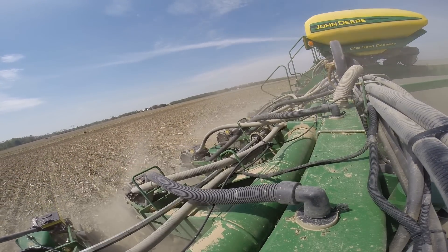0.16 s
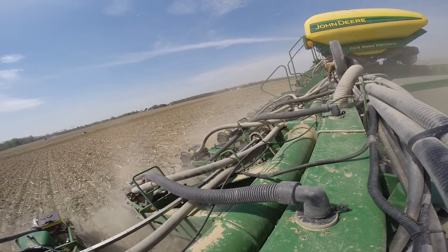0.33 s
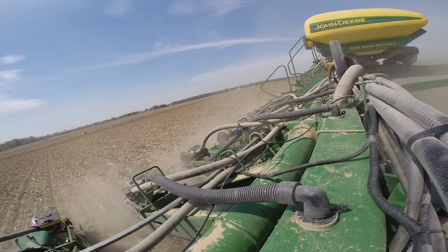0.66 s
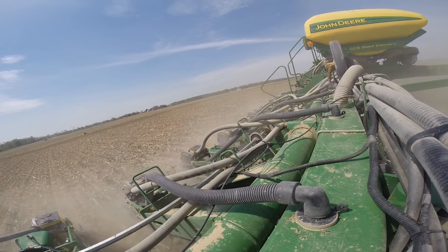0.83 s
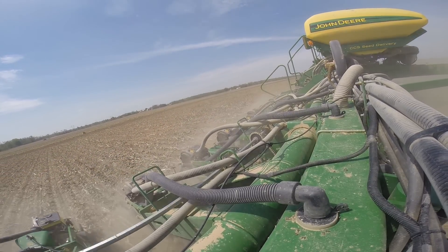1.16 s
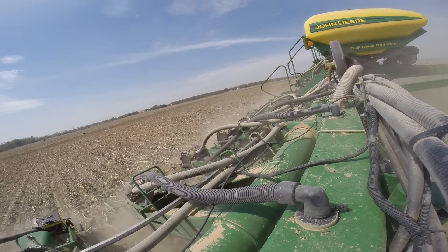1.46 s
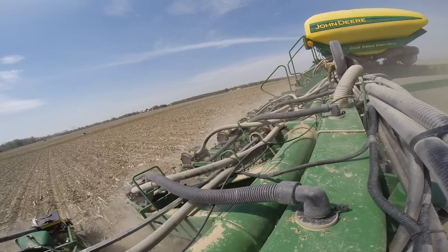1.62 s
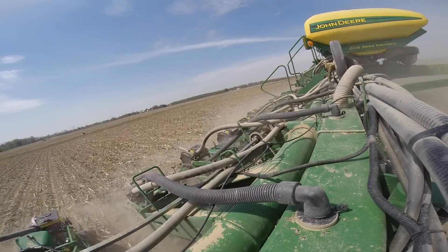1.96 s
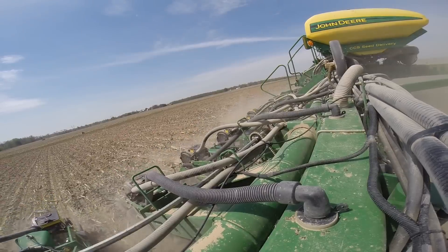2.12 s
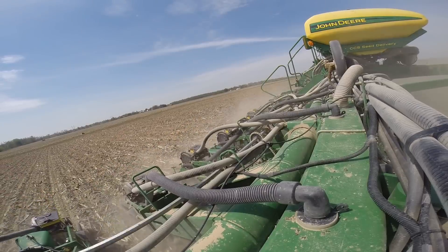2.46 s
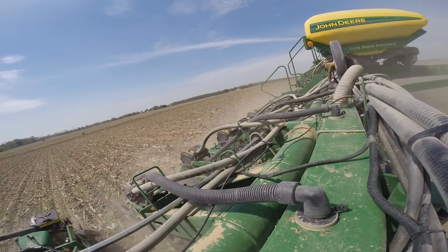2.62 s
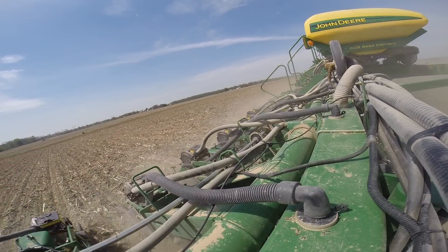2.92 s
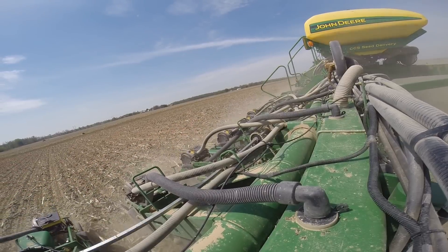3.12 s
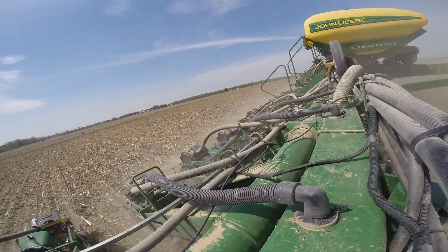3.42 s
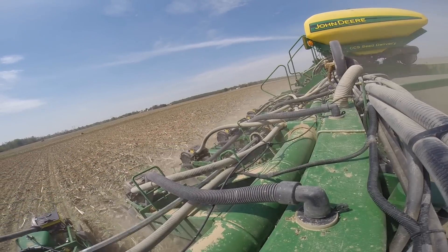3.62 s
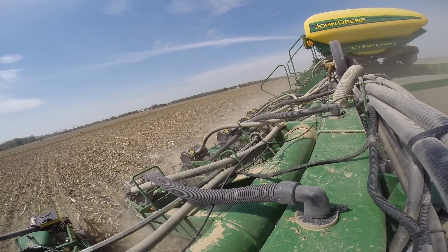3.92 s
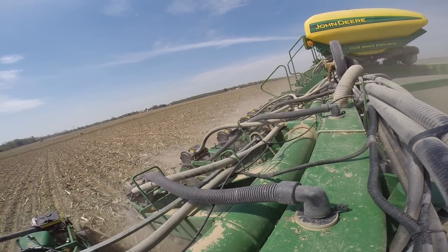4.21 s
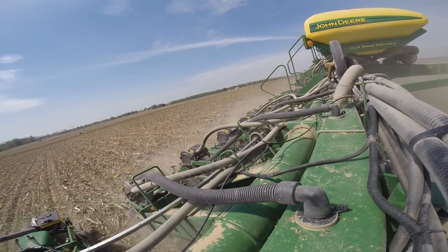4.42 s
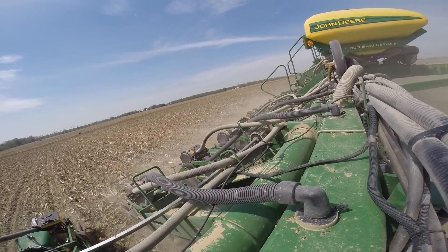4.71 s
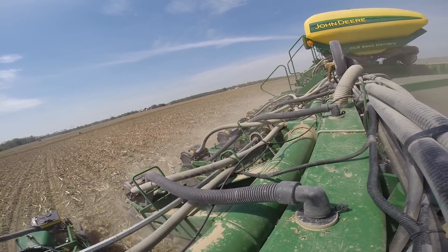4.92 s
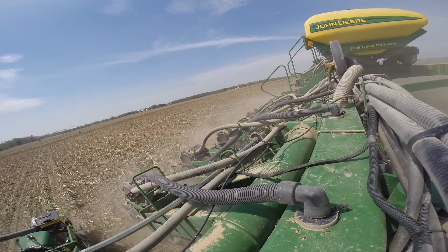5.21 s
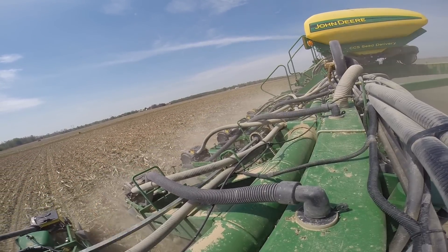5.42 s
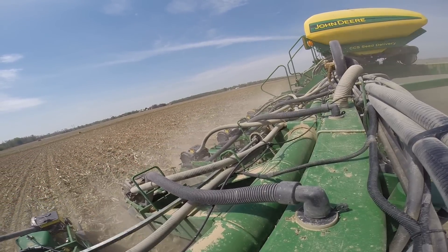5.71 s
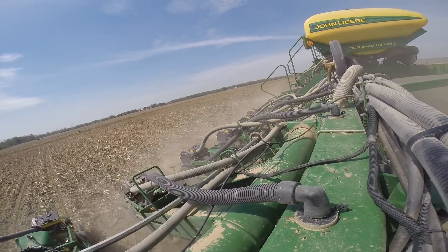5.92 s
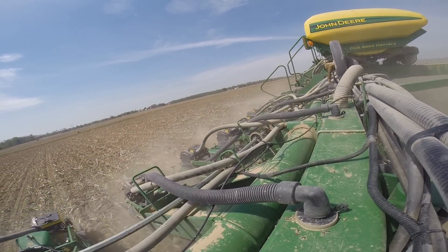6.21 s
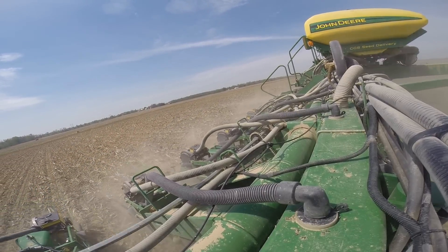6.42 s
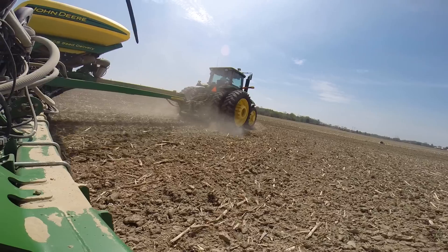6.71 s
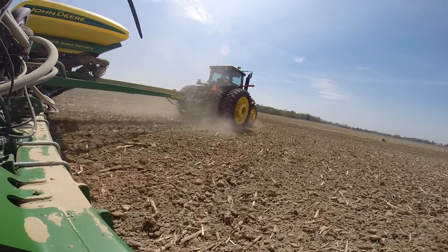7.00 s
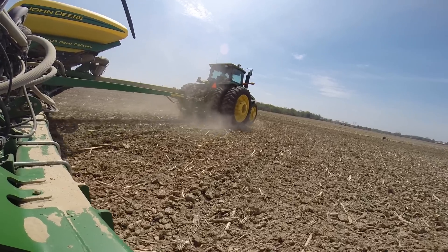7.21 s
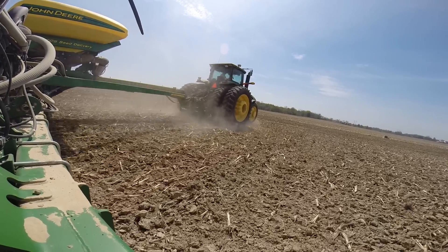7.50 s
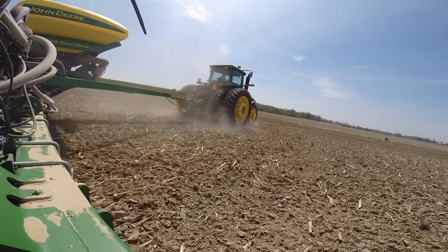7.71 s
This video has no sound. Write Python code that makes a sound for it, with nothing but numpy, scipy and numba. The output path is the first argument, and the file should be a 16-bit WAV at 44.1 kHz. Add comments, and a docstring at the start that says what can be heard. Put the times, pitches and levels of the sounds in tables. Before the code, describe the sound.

Close, dry outdoor sound from a seed planter's frame in a tilled field. From 0 to 6.7 seconds, a heavy low rumble swells and eases unevenly under pattering soil, loose steel rattle, a low blower hum with faint whine and steady airy hiss. Small knocks dot the first 1.6 seconds, and short dry squeals around 2 kHz recur, a longer one at 1.1 and another at 2.8. Hard hollow clanks with deep thuds and lingering sway hit at 2.25 and 2.4, then 3.5, a sharp one at 4.4, 5.0 and 5.7; the loudest briefly duck everything. Chirps cluster near 4.1 and 5.0 to 5.3. Lighter knocks follow at 6.1 to 6.4. At 6.75 it switches abruptly to a steadier diesel drone and low rumble, with thin wavering whines, soft soil hiss, sparse bright grit ticks and two faint squeaks, continuing to the end near 8.

```python
"""A wide seed planter rumbles and rattles over a dry tilled field behind a tractor, heard from its frame.
Noise and tiny random impacts drive its hollow frame and steel. Dry pivots squeal as gliding sines,
row units slam on their stops as bursts of contacts, and a seed blower whines in sines and hisses in noise.
Near the end we hear the tractor side instead: a diesel drone, whines, hiss and ticking crumbs of soil.
A level control ducks the loud peaks, such as hard knocks."""
import sys
import numpy as np
from scipy import signal
from scipy.fft import rfft, irfft, next_fast_len
from scipy.io import wavfile
from scipy.ndimage import uniform_filter1d, minimum_filter1d, map_coordinates
from numba import njit

SR = 44100
rng = np.random.default_rng(int(sys.argv[2]) if len(sys.argv) > 2 else 0)


def store_pcm(level_fs):
    """Save levels as 16-bit WAV."""
    pcm = np.round(np.clip(level_fs, -1, 1) * 32767).astype(np.int16)
    wavfile.write(sys.argv[1], SR, np.atleast_2d(pcm).T)


N = 346626
T = np.arange(N) / SR  # time in seconds

# Roughness of the ride. Each row: time in seconds, low rumble in dB, row unit rattle in dB.
RIDE = [(0, -13.5, -23), (.45, -14.5, -16.5), (.7, -17, -23), (1.249, -10, -19.5), (1.55, -21.5, -25.5),
        (1.801, -15.5, -20.5), (2.8, -13.5, -21), (3.7, -17, -21.5), (4.6, -14.5, -20), (5.15, -13.5, -18),
        (6.001, -17.5, -24.5), (6.35, -16.5, -21.5), (6.68, -16, -19)]
# Row units hitting their stops. Each row: start in seconds, rough length of the chatter in seconds,
# steel clank in dB, frame thud in dB.
KNOCKS = [(0.24, 0.02, -26, -11.5), (0.385, 0.023, -36.5, -14.5), (0.442, 0.013, -20.5, -11.5),
          (0.808, 0.026, -24, -14), (1.061, 0.021, -22.5, -23.5), (1.298, 0.022, -25, -13.5),
          (1.581, 0.005, -22, -17), (2.246, 0.018, -13, -13.5), (2.252, 0.015, -3.5, 0.5),
          (2.267, 0.028, -18.5, 0), (2.389, 0.021, -12.5, -2.5), (2.41, 0.025, -2.5, 0),
          (2.44, 0.017, -20, 0), (3.521, 0.0085, -5, -1), (3.54, 0.024, -14.5, -4.5),
          (3.765, 0.025, -32, -26), (3.876, 0.012, -17, -12), (4.057, 0.016, -23, -38),
          (4.275, 0.034, -14.5, -6), (4.378, 0.038, -14, -3), (4.393, 0.0074, 4.5, 2),
          (4.419, 0.017, -12, -6), (4.904, 0.0092, -20, -18), (4.978, 0.028, -10.5, -4),
          (5.035, 0.012, -24, -6.5), (5.592, 0.056, -31, -12), (5.622, 0.011, -17, -38),
          (5.664, 0.02, -28, -3.5), (5.697, 0.0045, 4.5, -2), (5.706, 0.01, -10.5, -5),
          (6.126, 0.036, -31.5, -19), (6.258, 0.026, -25, -16), (6.361, 0.022, -25, -13)]
# Squeals of one dry pivot. Each row: start in seconds, length in seconds, level in dB.
PIVOT_SQUEALS = [(0.054, 0.04, -15), (0.267, 0.032, -20), (0.448, 0.047, -16), (0.781, 0.058, -16),
                 (1.133, 0.19, -12.5), (1.32, 0.067, -18.5), (1.672, 0.068, -17), (1.776, 0.068, -18.5),
                 (2.18, 0.038, -17), (2.792, 0.15, -15), (2.951, 0.046, -20.5), (3.019, 0.08, -20),
                 (3.315, 0.07, -19), (3.391, 0.077, -16.5), (3.494, 0.12, -22), (4.818, 0.044, -16),
                 (6.089, 0.046, -21.5), (6.511, 0.029, -29), (6.724, 0.025, -16.5), (6.95, 0.056, -29),
                 (7.36, 0.04, -29)]
# Chirps of other joints; the 3830 Hz row at 5.03 s is an upper tone of the 2670 Hz chirp that starts just
# before it. Each row: start in seconds, length in seconds, pitch in Hz, level in dB.
CHIRPS = [(0.104, 0.041, 9700, -49), (0.181, 0.01, 3470, -29.5), (0.8, 0.07, 5200, -42.5),
          (1.425, 0.024, 1495, -24.5), (2.835, 0.012, 2550, -15.5), (2.981, 0.026, 2460, -17),
          (4.05, 0.015, 2520, -16), (4.11, 0.04, 9800, -46.5), (4.122, 0.023, 2245, -14),
          (4.19, 0.034, 1488, -20.5), (5.024, 0.07, 2670, -10.5), (5.03, 0.047, 3830, -36),
          (5.064, 0.039, 1766, -23), (5.19, 0.043, 2524, -18), (5.25, 0.026, 1250, -27.5),
          (5.319, 0.033, 2190, -30), (5.621, 0.04, 1470, -21), (5.785, 0.035, 2960, -23.5)]
# Resonances of the ringing steel. Each row: pitch in Hz, width in Hz, relative level in dB.
STEEL_MODES = [(1480, 29, -2.5), (2406, 95, 8), (2524, 180, -3.5), (2640, 53, -5), (3030, 510, -11.5),
               (3340, 87, -19), (6230, 550, -28.5)]
# Resonances of the hollow frame. Each row: pitch in Hz, width in Hz, relative level in dB.
FRAME_MODES = [(83.7, 12.5, 13.5), (151, 18.3, 11), (275, 81, 1.5), (376.4, 45.5, 3), (498, 80, -3.5),
               (638, 155, -7.5), (1012, 172, -10), (1800, 270, -19.5)]
# Whine of the 13-blade blower. Each row: multiple of the shaft rate, level in dB.
BLOWER_TONES = [(1, -22.5), (5, -37.5), (13, -42.5), (22, -47.5), (26, -42.5), (39, -59), (52, -54.5),
                (65, -46.5), (67, -61), (68, -57), (77, -82.5), (78, -59.5), (79, -64.5), (80, -57.5),
                (91, -60), (143, -71.5)]
# Engine, pump and fan tones on the tractor side. Each row: pitch in Hz, relative level in dB.
TRACTOR_TONES = [(69.6, -20.5), (139, -27), (374, -46), (586.8, -47), (748.3, -47), (882.9, -52),
                 (1168, -49), (1491, -50), (1755, -46.5), (2239, -37), (2637, -53), (3391, -54),
                 (3526, -51), (3935, -53), (4000, -49), (4409, -46), (5900, -59)]
# Tone colour of the frame's rumble. Each row: frequency in Hz, relative gain in dB.
RUMBLE_COLOUR = [(10, -44), (20, -7.5), (48, -19), (66, -8.5), (77, -5.5), (88, 3), (102, -3), (120, -20),
                 (155, -6), (200, -13.5), (260, -23.5), (500, -55)]
# Tone colour of the soil and small parts pattering on steel. Each row: frequency in Hz, relative gain in dB.
PATTER_COLOUR = [(120, 14.5), (250, -9), (350, 4.5), (480, -1), (700, -2), (810, -11.5), (1000, -5.5),
                 (1320, -15.5), (1520, -11), (1950, -21), (2400, -21.5), (3200, -28), (4500, -30.5),
                 (9000, -31.5)]
# Tone colour of the air in the seed hoses. Each row: frequency in Hz, relative gain in dB.
AIR_COLOUR = [(300, 13.5), (1200, 3.5), (2500, 9), (3200, -2.5), (3800, -5.5), (4450, 0.5), (5000, -4),
              (5400, -5.5), (5750, -5), (6350, -5), (6900, -12.5), (8200, -16), (11000, -20.5),
              (14500, -25)]
# Tone colour of the tractor side's rumble. Each row: frequency in Hz, relative gain in dB.
TRACTOR_RUMBLE_COLOUR = [(12, -51), (20, -11), (32, -14.5), (52, -18), (76, 1), (140, -6.5), (258, -23.5),
                         (292, -45), (366, -51), (400, -54), (520, -59), (880, -120)]
# Tone colour of the hiss of soil and seed. Each row: frequency in Hz, relative gain in dB.
SOIL_COLOUR = [(250, 6.5), (500, 11), (850, 2), (1600, 6), (1950, -3), (2200, 11.5), (2700, 0), (4200, 1.5),
               (4900, -8.5), (6200, -1), (6900, -9.5), (9000, -16.5), (12500, -22), (15000, -29)]

TRACTOR_SIDE_S = 6.745  # when the tractor side takes over, in seconds
BLOWER_HZ = 67.88  # shaft turns per second
TRACTOR_RUMBLE_DB = -16.5
SWAY_DB, SWAY_DECAY_S = -7, 0.069  # low shaking after a knock: level against the thud, decay of its gain
CRACK_DB = -23  # bright edge of a contact, against the clank
PIVOT_HZ, PIVOT_SAG_HZ = 2136, 23.8  # pitch at mid-stroke; how much lower it starts and ends
ARM_HZ, ARM_DB = 3022, -20.5  # a weak mode of the arm that sings along with the pivot
SQUEAL_ATTACK_S, SQUEAL_RELEASE_S = .014, 0.012
CHIRP_SAG_HZ = 30
# Faint squeaks along the toolbar
SQUEAK_LOW_HZ, SQUEAK_HIGH_HZ, SQUEAK_S, SQUEAK_SAG_HZ = 1810, 3570, 0.032, 120
SQUEAK_DB, SQUEAK_TILT_DB = -35, -10.5  # level at the middle pitch; the highest against the lowest
GRIT_PER_S, GRIT_DB = 14, -36  # average crumbs per second; peak level of the strongest


def undb(db):
    """Turn decibels into gain."""
    return 10 ** (np.asarray(db) / 20)


def unit(x):
    """Scale to an average (rms) level of 1."""
    return x / np.sqrt(np.mean(x ** 2))


def walk(rate, size=N):
    """Smooth random wandering with rms 1; a higher rate (steps per second) wanders faster."""
    step = max(int(SR / rate), 1)
    stairs = np.repeat(rng.standard_normal(4000)[:size // step + 1], step)[:size]
    return unit(uniform_filter1d(uniform_filter1d(stairs, step), step))


def colour(x, points):
    """Shape a sound's spectrum by (Hz, dB) points, fading outside them; rms 1."""
    hz, db = np.transpose(points)
    size = next_fast_len(N)
    f = np.maximum(np.arange(size // 2 + 1) * SR / size, 1)
    gain = undb(np.interp(np.log(f), np.log(hz), db))
    gain = gain * np.minimum(f / hz[0], 1) ** 2 * np.minimum(hz[-1] / f, 1) ** 2
    return unit(irfft(rfft(x, size) * gain, size)[:N])


def soften(x, hz):
    """Low-pass filter: a softer contact makes less treble."""
    return signal.sosfilt(signal.butter(3, min(hz, .45 * SR), fs=SR, output="sos"), x)


def ring(x, modes):
    """Let a sound drive resonances, added with alternating signs."""
    out = np.zeros(len(x))
    for k, (hz, width, db) in enumerate(modes):
        b, a = signal.iirpeak(hz, hz / width, fs=SR)
        out += (-1) ** k * undb(db) * signal.lfilter(b, a, x)
    return out


def grains(rate, spread_db):
    """Random tiny impacts of unequal size, at an average rate per second."""
    strength = undb(spread_db * np.minimum(rng.exponential(size=N), 5))
    return unit((rng.random(N) < rate / SR) * strength * rng.standard_normal(N))


def add(out, s, x):
    """Mix a short sound in at time s in seconds."""
    i = max(int(s * SR), 0)
    out[i:i + len(x)] += x[:max(N - i, 0)]


def turns(hz, wander):
    """Count the turns of a shaft whose speed wanders a little."""
    return np.cumsum(hz * (1 + wander * walk(5))) / SR


def tones(phase, lines, flutter_db):
    """Sines at multiples of a phase, each wavering in the moving air."""
    out = np.zeros(N)
    for multiple, db in lines:
        level = np.sqrt(2) * undb(db + flutter_db * walk(14))
        out += level * np.sin(2 * np.pi * (multiple * phase + rng.random()))
    return out


def ride():
    """Rumble and rattle levels in dB over time, as the ground gets rougher or smoother."""
    s, *columns = np.transpose(RIDE)
    return [np.interp(T, s, c) for c in columns]


def shaking(points):
    """Coloured low noise of a shaking frame, its slow swells partly evened out."""
    shake = colour(rng.standard_normal(N), points)
    return shake / np.sqrt(uniform_filter1d(shake ** 2, size=3000) + .5)


def frame(rumble_db, rattle_db):
    """Clods shake and bump the frame, which sways on after each knock; loose links and soil patter on steel."""
    jostle = undb(2.0 * walk(45))
    patter = colour(soften(grains(2200, 1.43) * jostle, 4500), PATTER_COLOUR)
    link_taps = grains(900, 0.87) * undb(2.36 * walk(25))
    links = unit(soften(ring(link_taps, STEEL_MODES), 4700))
    bumps = unit(soften(ring(grains(70, 0.78), FRAME_MODES), 693))
    rattle = undb(-2.0) * patter + undb(-14.0) * links + undb(-4.5) * bumps

    sway_power = np.zeros(N)
    t = T[:SR]
    for s, _, _, thud_db in KNOCKS:
        sway = undb(thud_db + SWAY_DB) * np.minimum(t / .01, 1) * np.exp(-t / SWAY_DECAY_S)
        add(sway_power, s, sway ** 2)
    rumble = shaking(RUMBLE_COLOUR) * np.sqrt(undb(rumble_db) ** 2 + sway_power)

    clods = undb(1.7 * walk(12))  # the rattle comes in uneven bursts
    return rumble + clods * undb(rattle_db) * rattle


def blower():
    """Blade tones, a buzz that repeats each shaft turn, and air rushing through the seed hoses."""
    shaft = turns(BLOWER_HZ, wander=0.00072)
    one_turn = rng.standard_normal(640)
    buzz = map_coordinates(one_turn, [shaft % 1 * len(one_turn)], order=3, mode="grid-wrap")
    throb = 1  # the air pulses a few times per turn
    for per_turn, depth in [(2, 0.049), (3, 0.18), (5, 0.11)]:
        throb = throb + depth * np.cos(2 * np.pi * per_turn * shaft)
    air = colour((rng.standard_normal(N) + 0.069 * buzz) * throb, AIR_COLOUR)
    air_level = undb(-35.0 + .5 * walk(8.1))
    return tones(shaft, BLOWER_TONES, flutter_db=2.0) + air_level * air


def slip(length, hz, sag_hz):
    """Stick-slip locks onto a steel mode: it builds up, is highest at mid-stroke, trembles and rings on briefly."""
    t = T[:int((length + .06) * SR)]
    arch = (2 * np.minimum(t / length, 1) - 1) ** 2  # 1 at both ends, 0 at mid-stroke
    waver = .005 * walk(200, size=len(t)) + .002 * walk(30, size=len(t))
    tremble = undb(1.3 * walk(60, size=len(t)) + 1.3 * walk(400, size=len(t)))
    attack = np.clip((t + 0.005) / SQUEAL_ATTACK_S, 0, 1) ** 2
    release = np.exp(-np.maximum(t - length + 0.012, 0) / SQUEAL_RELEASE_S)
    pitch = (hz - sag_hz * arch) * (1 + waver)
    return np.sqrt(2) * attack * release * tremble * np.sin(2 * np.pi * np.cumsum(pitch) / SR)


def squeals():
    """Stick-slip of the dry pivot with its arm, chirps of other joints (one with an upper tone), and faint
    squeaks at random."""
    out = np.zeros(N)
    for s, length, db in PIVOT_SQUEALS:
        pivot = slip(length, PIVOT_HZ, PIVOT_SAG_HZ)
        arm = undb(ARM_DB) * slip(length, ARM_HZ, PIVOT_SAG_HZ)
        add(out, s, undb(db) * (pivot + arm))
    for s, length, hz, db in CHIRPS:
        add(out, s, undb(db) * slip(length, hz, CHIRP_SAG_HZ))
    for when, pitch in rng.random(size=(30, 2)):
        hz = SQUEAK_LOW_HZ + pitch * (SQUEAK_HIGH_HZ - SQUEAK_LOW_HZ)
        level = undb(SQUEAK_DB + SQUEAK_TILT_DB * (pitch - .5))
        add(out, when * TRACTOR_SIDE_S, level * slip(SQUEAK_S, hz, SQUEAK_SAG_HZ))
    return out


def knocks():
    """Each knock is a short chatter of contacts that cracks, rings the steel and thumps the frame."""
    out, t = np.zeros(N), T[:SR // 3]
    edge = signal.butter(2, [1100, 5000], "bandpass", fs=SR, output="sos")
    for s, length, clank_db, thud_db in KNOCKS:
        burst = np.minimum(t / 0.0023, 1) * np.exp(-(t / (1.224 * length)) ** 2)
        contact = burst + 0.034 * np.exp(-t / 0.022)  # a faint tail follows the burst
        # the heavy frame takes a softer push than the bare steel
        for modes, db, soft_hz in ((STEEL_MODES, clank_db, 5500), (FRAME_MODES, thud_db, 2600)):
            chatter = rng.standard_normal(len(t)) * (rng.random(len(t)) < 5000 / SR) * contact
            body = soften(ring(chatter, modes), soft_hz)
            loudest = uniform_filter1d(body ** 2, int(length * SR)).max()
            add(out, s, body * undb(db) / np.sqrt(loudest))
        crack = unit(soften(signal.sosfilt(edge, rng.standard_normal(len(t))), 4400))
        add(out, s, undb(clank_db + CRACK_DB) * contact * crack)
    return out


def tractor(rumble_db):
    """Diesel drone and pump whines as wavering sines, low rumble, and the hiss of soil and seed as noise."""
    clock = turns(1, wander=.0018)  # one turn a second, so the tones' multiples are Hz
    flicker = undb(1.6 * walk(70) + 1.0 * walk(300))
    drone = tones(clock, TRACTOR_TONES, flutter_db=2.6) * flicker
    rumble = undb(rumble_db) * shaking(TRACTOR_RUMBLE_COLOUR)
    soil = colour(rng.standard_normal(N) + 0.5 * grains(630, 3.5), SOIL_COLOUR)
    return undb(-1.3) * drone + rumble + undb(-33.5 + .5 * walk(30)) * soil


def grit():
    """Crumbs of dry soil tick on a small housing at uneven intervals: short bursts of bright noise."""
    out, t = np.zeros(N), T[:SR // 30]
    housing = signal.butter(2, [5500, 14000], "bandpass", fs=SR, output="sos")
    fade = np.exp(-t / 0.0011) + 0.17 * np.exp(-t / 0.0068)
    s = TRACTOR_SIDE_S
    for gap, strength in rng.random(size=(24, 2)):
        tick = signal.sosfilt(housing, rng.standard_normal(len(t)) * fade)
        level = undb(GRIT_DB + 1.5 * np.log(max(strength, .05)))
        add(out, s, level * tick / np.abs(tick).max())
        s += 2 * gap / GRIT_PER_S
    return out


def scene():
    """The planter side, then the tractor side; knocks and squeals keep their level on both."""
    facing_tractor = np.clip((T - TRACTOR_SIDE_S) / .01, 0, 1)
    planter = frame(*ride()) + blower()
    machine = planter * (1 - facing_tractor) + tractor(TRACTOR_RUMBLE_DB) * facing_tractor
    return (machine + squeals() + knocks() + grit())[None]


@njit
def peak_hold(x, attack, release):
    """Follow the level: rise fast to peaks and sink slowly."""
    out, e = np.empty(len(x)), 0.
    for i in range(len(x)):
        e = e + attack * (x[i] - e) if x[i] > e else e * release
        out[i] = e
    return out


def record(dry):
    """Gain ducks just ahead of each loud peak and creeps back; peaks are rounded and the top is cut."""
    threshold, ratio, attack_s = .58, 7, .0002
    envelope_fall_db_per_s = 14.0
    release = float(undb(-envelope_fall_db_per_s / SR))
    envelope = peak_hold(np.abs(dry[0]), 1 / (attack_s * SR), release)
    gain = (threshold / np.maximum(envelope, threshold)) ** (1 - 1 / ratio)
    # centred windows of 80 samples let the gain drop before the peak arrives
    ducked = dry * uniform_filter1d(minimum_filter1d(gain, size=80), size=80)
    rounded = ducked / (1 + ducked ** 16) ** (1 / 16)
    top_cut = signal.ellip(8, .2, 70, 14900, fs=SR, output="sos")  # steep low-pass at 14900 Hz
    return signal.sosfilt(top_cut, rounded)


dry = scene()
out = record(dry)
store_pcm(out)
```